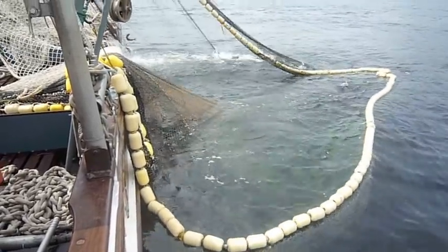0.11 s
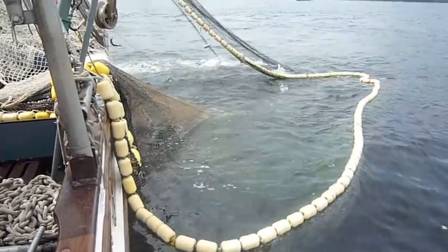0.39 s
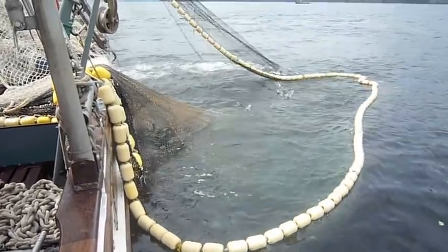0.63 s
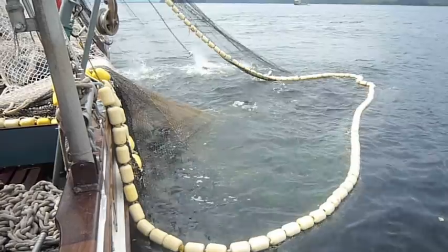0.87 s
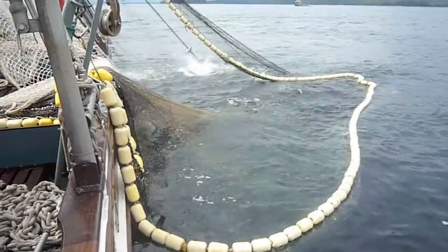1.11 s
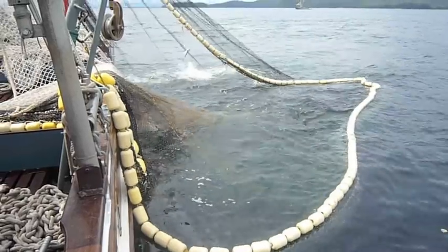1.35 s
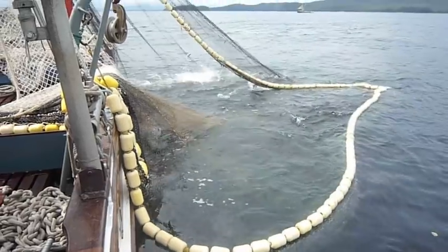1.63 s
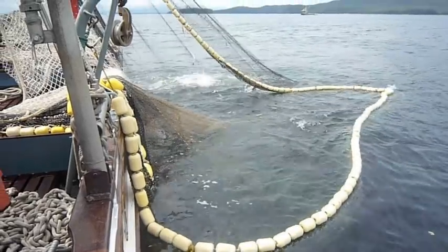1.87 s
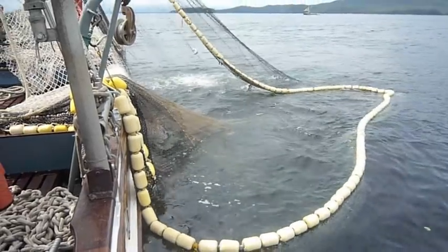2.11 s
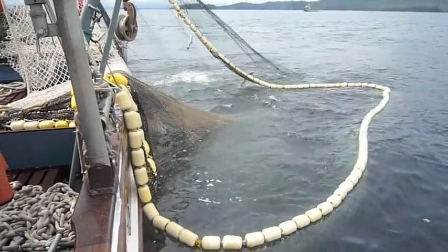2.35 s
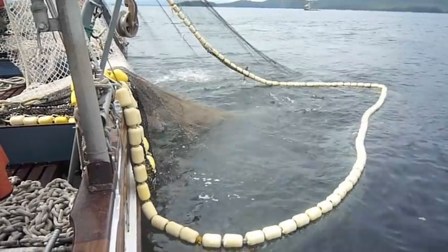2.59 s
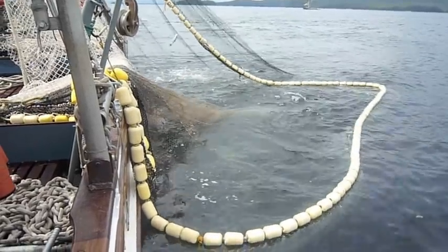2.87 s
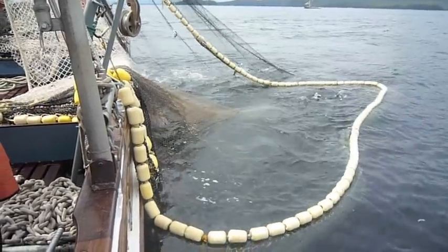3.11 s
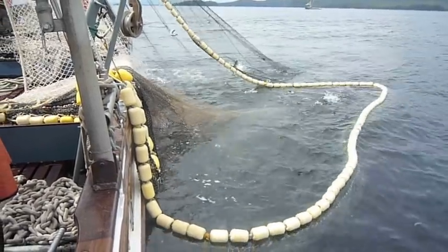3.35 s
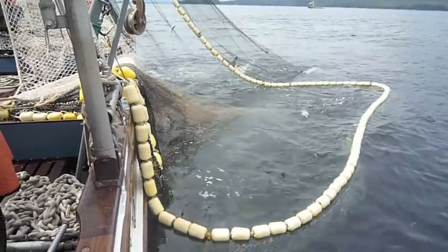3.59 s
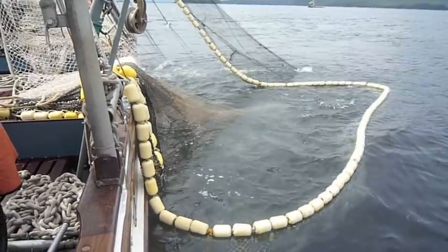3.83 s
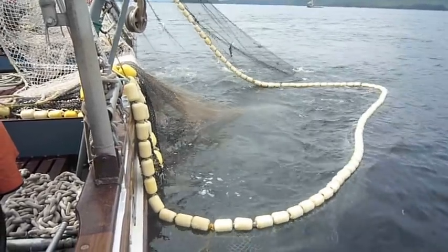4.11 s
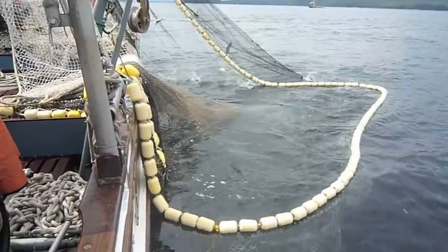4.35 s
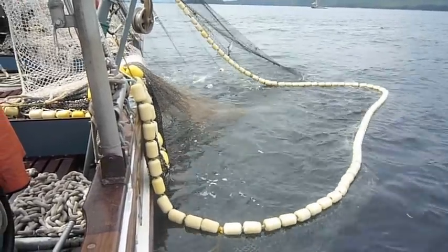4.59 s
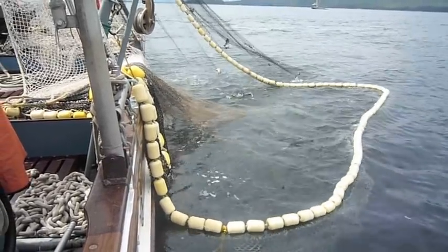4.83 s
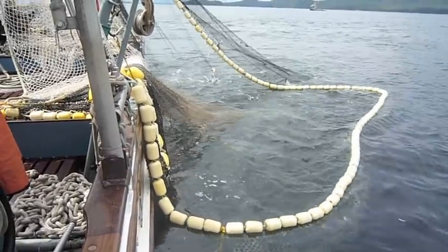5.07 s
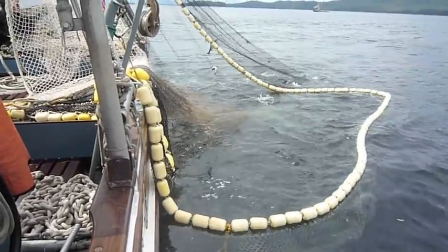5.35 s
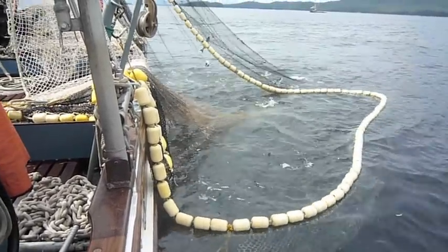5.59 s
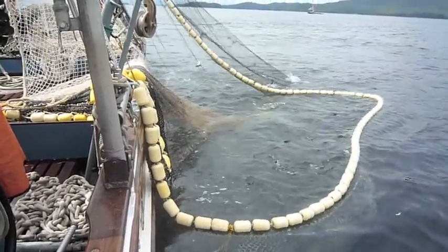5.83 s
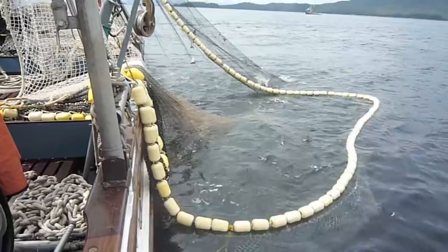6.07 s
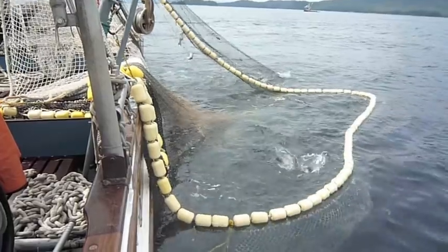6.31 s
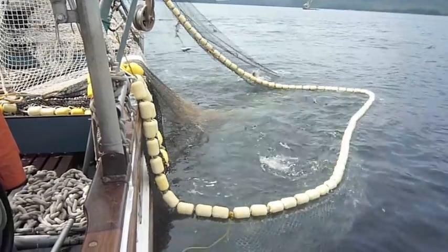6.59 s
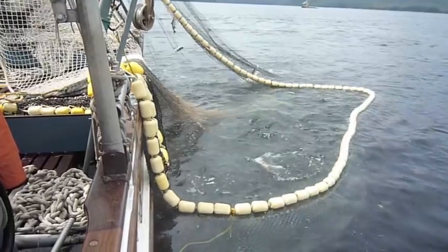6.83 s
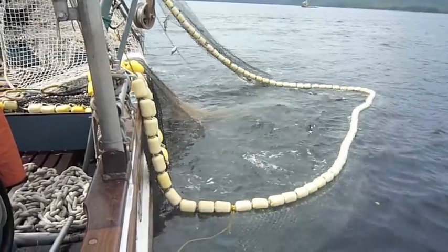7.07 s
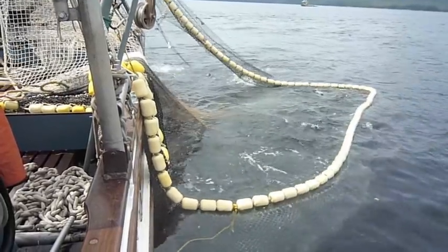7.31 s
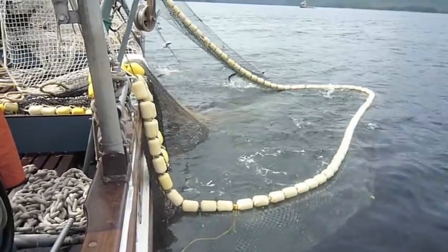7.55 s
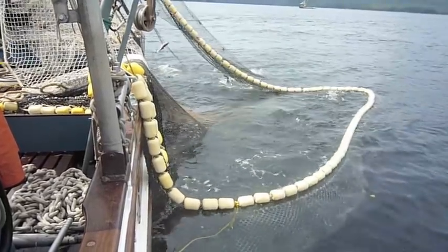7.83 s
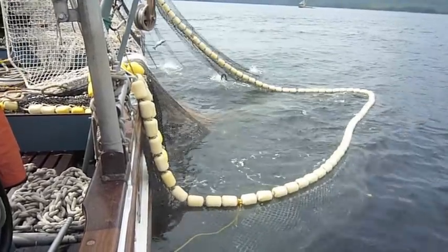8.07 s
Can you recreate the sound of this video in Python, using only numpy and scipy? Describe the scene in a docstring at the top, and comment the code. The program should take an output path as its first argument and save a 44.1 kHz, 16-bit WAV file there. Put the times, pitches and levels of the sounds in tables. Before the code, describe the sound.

A steady diesel throb dominates throughout, deep and slightly rough, with a hollow boom and exhaust noise. Over it, water hisses and churns unevenly. Fish make short wet slaps and sprays, early, around three seconds, and most busily from six to nearly eight. Rounded bubble plops, a short thin metal squeal and faint chirps add detail. Open water, mono deck microphone, limited treble.

```python
"""Boat diesel with fish in a net

An eight-cylinder diesel, built from many steady tones, holds a governed speed beside a deck microphone.
A second machine hums under it, shaped noise makes the exhaust roar and a hollow boom. Water (flickering
noise) washes in the net; fish slap and splash (noise bursts). Bubbles plop, a metal ring sings and thin
chirps pass (tones that swell and fade)."""
import sys
import numpy as np
from scipy import signal
from scipy.fft import rfft, irfft
from scipy.io import wavfile
from scipy.ndimage import map_coordinates

SR = 44100
rng = np.random.default_rng(int(sys.argv[2]) if len(sys.argv) > 2 else 0)


def volts_from_decibels(level):
    """Turn decibel levels (scalar or array-like) into linear amplitude factors."""
    exponent = np.asarray(level, float) / 20
    return 10 ** exponent


def wav_out(sig):
    """Save sig, one row per channel (or a flat mono array), as 16-bit PCM at SR to the path in sys.argv[1]."""
    wavfile.write(sys.argv[1], SR, np.round(np.clip(np.atleast_2d(sig).T, -1, 1) * 32767).astype(np.int16))


N = 361179
T = np.arange(N) / SR  # time in s


def drift(rate):
    """Slow chance: random levels, rate per second (39 at most), joined smoothly, spread near 1."""
    knots = rng.standard_normal(int(N / SR * 40) + 4)
    curve = map_coordinates(knots, [T[::64] * min(rate, 39)], order=3)
    return curve.repeat(64)[:N]


def colour(x, points):
    """Give white sound a spectrum drawn through (f/Hz, level/dB) points."""
    hz, db = np.transpose(points)
    f = np.fft.rfftfreq(len(x), 1 / SR) + 1
    gain = volts_from_decibels(np.interp(np.log(f), np.log(hz), db))
    return irfft(rfft(x) * gain, len(x))


def band(x, lo_hz, hi_hz):
    """Keep only the sound between two frequencies, scaled to rms 1 (if centred on zero)."""
    sos = signal.butter(2, [lo_hz, hi_hz], "band", fs=SR, output="sos")
    y = signal.sosfilt(sos, x)
    return y / y.std()


def add(out, s, x):
    """Mix a short sound in at time s, in seconds."""
    i = int(s * SR)
    out[i:i + len(x)] += x[:N - i]


def fade(t60, rise_s):
    """Outline of a blow: a quick rise, then a fall of 60 dB in t60 seconds (4 ms at least)."""
    t60 = max(t60, .004)
    t = T[:int(t60 * SR)]
    return np.minimum(t / rise_s, 1) * np.exp(-np.log(1000) * t / t60)


def boom():
    """Noise ringing a hollow space near 280 Hz, coming and going."""
    level_db = -42.5 + 1.2 * drift(2.1)
    return band(rng.standard_normal(N), 270, 290) * volts_from_decibels(level_db)


# tones of a second machine: (f/Hz, middle rms level/dB)
HUM_TONES = [(26.7, -58), (35.6, -61), (53.35, -50), (76.9, -51), (80, -58), (97.9, -54), (130.6, -45),
             (153.8, -43), (163.2, -46), (177.8, -51), (183.4, -50), (192, -50), (240.1, -47)]


def hum(slip=0.027, waver_db=1.0):
    """Less steady tones: their phase slips about (slip in cycles) and their level wavers."""
    out = 0
    for hz, db in HUM_TONES:
        cycles = hz * T + rng.random() + slip * drift(1.5)
        out = out + np.sqrt(2) * volts_from_decibels(db + waver_db * drift(2.0)) * np.cos(2 * np.pi * cycles)
    return out


# exhaust and hull noise: (f/Hz, level in each Hz/dB)
ROAR_SPECTRUM = [(20, -74.5), (45, -68), (90, -63), (150, -53.5), (215, -59.5), (280, -52), (320, -62.5),
                 (500, -64), (570, -58), (850, -65.5), (1400, -73.5), (1550, -76.5), (3000, -90),
                 (7000, -108)]


def roar(crank, puff=0.067):
    """Turbulent exhaust: noise puffing a little once a turn, its level wandering."""
    # one cycle is two turns of the crank
    gate = 1 + puff * np.cos(2 * np.pi * 2 * (crank - THUMPS[0][1]))
    noise = colour(rng.standard_normal(N) * gate, ROAR_SPECTRUM) * np.sqrt(SR / 2)
    return noise * volts_from_decibels(.5 * drift(2.5))


# tone colour of the moving water: (f/Hz, relative level/dB)
WASH_SPECTRUM = [(500, -15.5), (1500, 6.5), (2500, 4.5), (4500, -3.5), (6000, -9), (7000, -14.5),
                 (8000, -41.5)]
# churn of water in the net: (t/s, level between 3 and 7 kHz/dB, extra level below about 3 kHz/dB)
WATER_CHURN = [(0.0, -55, -1), (0.43, -58, 1), (0.84, -53, -1.5), (1.62, -54, -1), (1.98, -59, -0.5),
               (2.69, -58.5, -1), (2.92, -57.5, 1.5), (3.78, -54, 0), (4.1, -57, -2), (4.95, -58.5, 1),
               (5.12, -56.5, 2), (5.57, -54, -2), (5.9, -59.5, 1), (6.41, -54.5, 0), (6.95, -58.5, -1.5),
               (7.48, -54.5, -1), (8.19, -57.5, 1.5)]


def wash(drops_per_s=1300.0, spread_db=5.0, drop_share=0.28, crackles_per_s=92.0, crackle_db=-8.0):
    """Hiss of moving water with droplets of uneven size; each part of the range flickers on its own over a
    common surge."""
    s, churn_db, dull_db = np.transpose(WATER_CHURN)
    churn = volts_from_decibels(np.interp(T, s, churn_db))
    dull_db = np.interp(T, s, dull_db)
    # wide-band spatter, more often when the water churns
    chance = crackles_per_s / SR * (churn / churn.mean()) ** 2
    spatter = rng.exponential(size=N) * (rng.random(N) < chance)
    spatter = volts_from_decibels(crackle_db) * signal.lfilter([1], [1, -np.exp(-1 / (0.0028 * SR))], spatter)
    surge, out = drift(11), 0  # the surge is common to all bands
    for lo in 700 * 2 ** np.arange(0, 4, .5):  # half-octave bands
        size = volts_from_decibels(spread_db * np.minimum(rng.exponential(size=N), 4.5))
        drops = size * (rng.random(N) < drops_per_s / SR)
        drops = signal.lfilter([1], [1, -np.exp(-lo / (5. * SR))], drops)  # each dies over a few cycles
        strength = 1 - drop_share + drop_share * drops / drops.std() + spatter
        noise = rng.standard_normal(N) * strength
        swell_db = 1.0 * surge + 1.6 * drift(22) + (lo < 3000) * dull_db
        out = out + band(noise, lo, lo * np.sqrt(2)) * np.sqrt(lo) * volts_from_decibels(swell_db)
    out = colour(out, WASH_SPECTRUM)
    bright = signal.butter(4, [3000, 7000], "band", fs=SR, output="sos")
    return out / signal.sosfilt(bright, out).std() * churn


# thin chirps: (t/s, length/s, start f/Hz, middle f/Hz, end f/Hz, peak level/dB)
CHIRPS = [(1.72, .042, 6130, 4830, 3600, -47.5), (1.77, .014, 5800, 5380, 5000, -54),
          (1.785, .022, 5000, 5150, 5350, -58), (3.345, .022, 5020, 5120, 5000, -55),
          (3.383, .036, 4150, 4450, 4100, -53)]


def squeak(swell=1.4):
    """Short thin chirps: the pitch bends through three points, the level swells and fades."""
    out = np.zeros(N)
    for s, length, *bend_hz, db in CHIRPS:
        u = np.linspace(0, 1, int(length * SR))
        hz = np.polyval(np.polyfit([0, .5, 1], bend_hz, 2), u)
        tone = np.sin(2 * np.pi * np.cumsum(hz) / SR)
        add(out, s, volts_from_decibels(db) * np.sin(np.pi * u) ** swell * tone)
    return out


# modes (natural tones) of a small metal ring: (f/Hz, relative level/dB)
RING_MODES = [(3758, 0), (5959, -9)]
# rubs on the ring: (t/s, length/s, level/dB)
RUBS = [(2.725, .011, -48), (2.749, .046, -44), (2.806, .036, -53), (2.868, .014, -56)]


def ring(attack_s=.003, t60_s=.08, dulls_db_per_s=-70, rough_db=2.):
    """A small metal ring, rubbed in short strokes, sings in its modes; the higher mode tires sooner."""
    env = 0
    for s, length, db in RUBS:
        after = np.maximum(T - s - length, 0)
        attack = np.clip((T - s) / attack_s, 0, 1)
        stroke = volts_from_decibels(db) * attack * np.exp(-np.log(1000) * after / t60_s)
        env = np.maximum(env, stroke)
    since = np.maximum(T - RUBS[0][0], 0)
    out = 0
    for k, (hz, db) in enumerate(RING_MODES):
        mode_db = db + k * dulls_db_per_s * since + rough_db * drift(39)
        out = out + volts_from_decibels(mode_db) * np.sin(2 * np.pi * hz * T)
    return env * out


# bubbles: (t/s, starting f/Hz, level/dB)
BUBBLES = [(.919, 1100, -26), (1.631, 3860, -34), (1.970, 3030, -42), (2.363, 4970, -36),
           (2.681, 2230, -34.5), (3.172, 2000, -33), (3.635, 2310, -26.5), (6.076, 1370, -23.5),
           (6.28, 1500, -30), (6.69, 1550, -29), (7.57, 1540, -29)]


def plops(cycles=62.0, glide=0.036):
    """Bubbles ring a set number of cycles and rise in pitch as they near the surface."""
    out = np.zeros(N)
    for s, hz, db in BUBBLES:
        env = fade(cycles / hz, 0.0014)
        t = T[:len(env)]
        # the pitch rises in all by twice the glide
        phase = 2 * np.pi * hz * t * (1 + glide * t / t[-1])
        add(out, s, volts_from_decibels(db) * env * np.sin(phase))
    return out


# slaps on the water: (t/s, dull middle level/dB, low body over it/dB, bright spray over it/dB)
FISH_SLAPS = [(0.1446, -36.5, -1, -11), (0.5908, -38.5, -5, -6), (0.706, -43.5, -3, -1),
              (0.8175, -46, -3, -2), (0.8659, -38.5, 0, -8.5), (0.9082, -38, 0, -1), (0.9384, -49, 2, 4),
              (0.9777, -32.5, 10, -8.5), (1.3722, -37, 2, -7), (1.5359, -36.5, 15, -1),
              (2.6808, -40, -5, -12.5), (2.9182, -38, 6, -5.5), (2.9418, -43.5, 15, 7),
              (2.9816, -38.5, 16.5, -5.5), (3.0575, -34.5, 16, 2), (3.1694, -41, 0, -16.5),
              (3.271, -39, 2, -17), (3.295, -42, -7, -17.5), (4.3277, -38, -3, -2.5),
              (4.368, -43.5, 6, -1.5), (4.428, -47, -3, 0.5), (5.214, -32, -5, -32), (5.3718, -46, -9, -11),
              (5.4088, -30.5, -9, -11), (6.1534, -40, -2, 0.5), (6.203, -38.5, -5, -5.5),
              (6.256, -42, 6, 2), (6.7062, -35, 1, -9.5), (6.98, -30, -1, -8.5), (7.0367, -42, 6, -6.5),
              (7.0489, -36, -1, -12), (7.0853, -31.5, 8, -23), (7.2402, -42.5, 4, -0.5),
              (7.5346, -35, -12, -18), (7.6864, -38, -1, -8)]


def slaps(t60=0.022, tail_db=-12.5, crack=7.):
    """A crack and a burst of spray for each slap, in a low, a dull and a bright range, then a patter."""
    # faint slaps at chance times, 1.5 a second
    count = int(1.5 * N / SR)
    times = rng.random(count) * (N / SR - .2)
    levels_db = (-49, 2, -5) + 2.5 * rng.standard_normal((count, 3))
    rows = np.r_[FISH_SLAPS, np.c_[times, levels_db]]
    s, dull_db, body_db, bright_db = rows.T
    out, spray, click = 0, rng.standard_normal(N), np.zeros(N)
    click[((s + .001) * SR).astype(int)] = 1
    ranges_hz = [(600, 1250), (1200, 3300), (3200, 6000)]
    for part_db, (lo, hi) in zip([body_db, 0, bright_db], ranges_hz):
        env = np.zeros(N)
        for at, db in zip(s, dull_db + part_db):
            add(env, at, volts_from_decibels(db) * fade(t60, 0.0018))
            add(env, at, volts_from_decibels(db + tail_db) * fade(5.5 * t60, 0.0048))  # the patter behind
        # filtered twice for steeper edges
        out = out + env * band(band(spray + crack * click, lo, hi), lo, hi)
    return out


# An order is a tone at a whole multiple of the engine's cycle rate.
# thumps: (lowest order, place in the cycle where even orders add up [share], same for odd orders [share])
THUMPS = [(0, .6485, .411), (15, .651, .398), (32, .648, .509), (61, .423, .381)]
# strong orders: (multiple of the cycle rate, middle rms level/dB)
STRONG_ORDERS = [(4, -44.6), (6, -44.2), (7, -38.0), (8, -24.8), (9, -43.2), (10, -35.0), (12, -31.6),
                 (13, -38.6), (15, -48.9), (16, -36.6), (17, -39.3), (18, -42.3), (22, -43.3), (23, -45.1),
                 (24, -42.8), (28, -49.3), (29, -47.8), (31, -49.8), (34, -47.8), (36, -40.7), (37, -43.2),
                 (40, -45.1), (41, -48.8), (43, -49.7), (44, -46.1), (46, -46.8), (48, -45.6), (51, -50.7),
                 (52, -48.9), (54, -45.5), (56, -50.7), (58, -50.1), (63, -57.4), (68, -56.6), (72, -55.7),
                 (77, -58.1), (88, -50.3), (92, -58.9)]
# the other orders lie near this line: (multiple of the cycle rate, rms level/dB)
FAINT_LINE = [(5, -57), (25, -57), (40, -54), (60, -63), (94, -64)]


def engine(cycle_hz=15.1272, scatter=.4, waver_db=.8, hunt=.0008, faint_scatter_db=2.5):
    """Orders of the firing cycle, lined up into thumps; pipe and hull smear their timing."""
    crank = cycle_hz * T + hunt * drift(0.698)  # in cycles; the governor hunts slightly
    lags, out = rng.standard_normal(128), 0
    faint_db = np.interp(np.arange(94), *np.transpose(FAINT_LINE))
    faint_db = faint_db + faint_scatter_db * rng.standard_normal(94)
    strong_db = dict(STRONG_ORDERS)
    for k in range(4, 94):
        db = strong_db.get(k, faint_db[k])
        thump = [row for row in THUMPS if row[0] <= k][-1]
        at = thump[1 + k % 2]
        looseness = min(k / 33.0, 1)  # long waves are smeared and shaken least
        # the pipe resonance rings on after each thump
        turn = -.7 * np.arctan((k - 10.5) / 1.5) * (k < 20)
        wave = np.cos(2 * np.pi * k * (crank - at) + turn + scatter * looseness * lags[k])
        out = out + volts_from_decibels(db + waver_db * looseness * drift(3.5)) * wave
    return np.sqrt(2) * out, crank


def scene():
    """Engine and hum over the water sounds, in one channel."""
    orders, crank = engine()
    machine = orders + hum() + roar(crank) + boom()
    water = wash() + slaps() + plops()
    return (machine + water + ring() + squeak())[None]


def band_limit(x):
    """A steep low-pass at the top of the band."""
    return signal.sosfilt(signal.butter(12, 7970, fs=SR, output="sos"), x)


def record(dry):
    """A narrow-band recorder with a small offset: tallest peaks are rounded, the top rolls off steeply."""
    knee = 0.32  # rounded peaks stay below this
    soft = dry / (1 + (dry / knee) ** 6) ** (1 / 6)
    low_pass = signal.butter(14, 7200, fs=SR, output="sos")
    finished = signal.sosfilt(low_pass, soft) - .0026
    return band_limit(finished)


dry = scene()
out = record(dry)
wav_out(out)
```